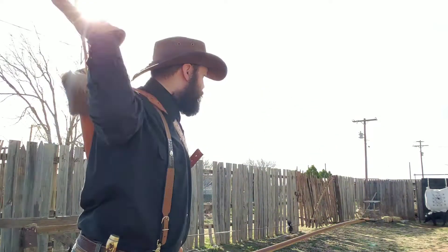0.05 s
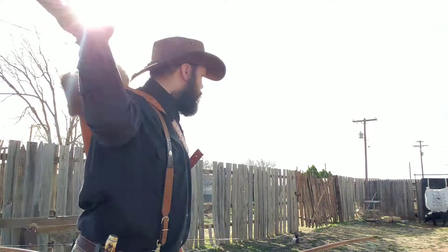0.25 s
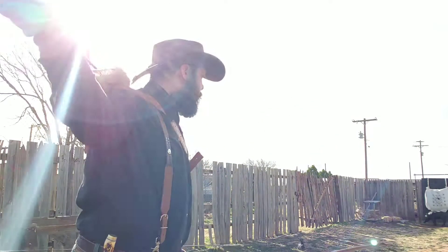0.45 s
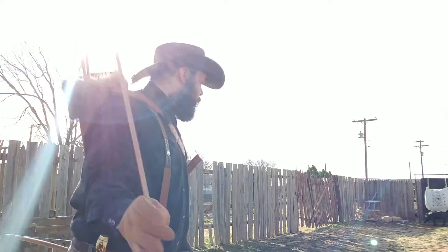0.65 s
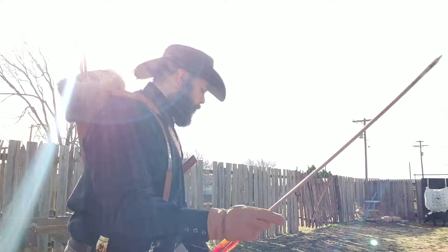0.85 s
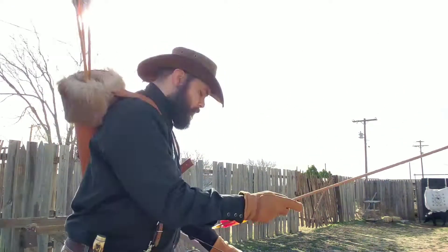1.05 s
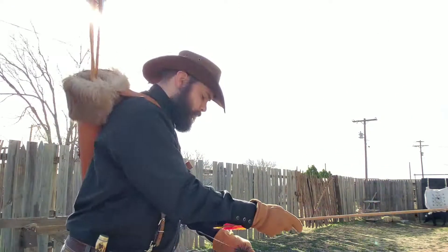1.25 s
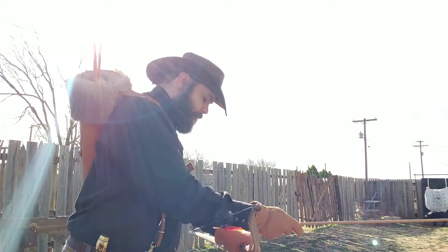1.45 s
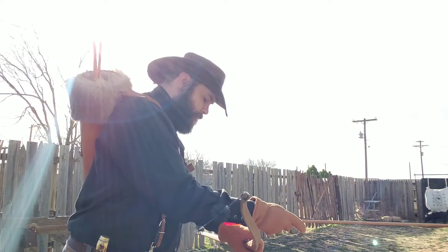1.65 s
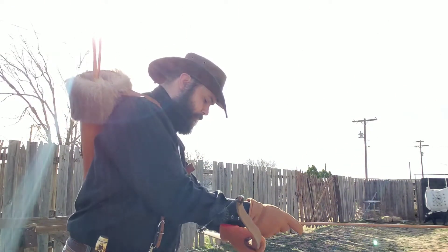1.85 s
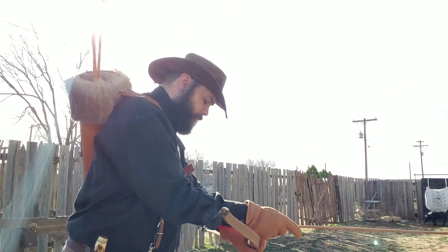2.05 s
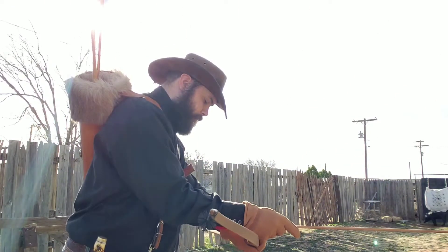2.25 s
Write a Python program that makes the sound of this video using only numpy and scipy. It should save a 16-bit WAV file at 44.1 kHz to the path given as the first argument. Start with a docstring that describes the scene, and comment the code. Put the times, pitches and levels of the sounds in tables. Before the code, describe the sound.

Wooden arrows tick and knock together as one slides from a quiver outdoors. Soft swishes of shaft and sleeve follow, then a few small clicks, while light gusts rumble unevenly on the microphone.

```python
"""Drawing an arrow from a quiver

In a quiet yard a wooden arrow scrapes out of a back quiver. It knocks against the others, exciting
bending modes of the shafts and the quiver's hollow note, then swishes softly down to the bow.
Eddies in the light wind rumble on the microphone ports; faint, thin whistles come and go."""
import sys
import numpy as np
from scipy import signal
from scipy.fft import rfft, irfft
from scipy.io import wavfile
from scipy.ndimage import uniform_filter1d

SR = 44100
rng = np.random.default_rng(int(sys.argv[2]) if len(sys.argv) > 2 else 0)


def output_pcm(signal):
    """Save a mono or channel-first signal as 16-bit PCM at the path in sys.argv[1].

    Samples are clipped to [-1, 1] before scaling.
    """
    pcm = np.clip(np.atleast_2d(signal).T, -1, 1) * 32767
    wavfile.write(sys.argv[1], SR, np.round(pcm).astype(np.int16))


N = 105840
T = np.arange(N) / SR

# Shaft impacts: t/s, click level/dB, click f/Hz, relative ring level/dB, quiver level/dB, left-right/dB
IMPACTS = [(.0238, -40, 4900, -63, -77, 3), (0.0265, -42, 5500, -75, -79, 4),
           (.0352, -51.5, 6200, -72, -77, 3.5), (.0742, -54, 5030, -54, -55, 5.5),
           (.5033, -22, 4720, -42, -66, 6), (.5062, -34, 4940, -60, -78, 5.5),
           (0.504, -35, 2520, -58, -65, 3.5), (0.528, -43.5, 3700, -53, -67, 4.5),
           (.5354, -36, 5400, -51, -56.5, 4.5), (.5550, -50, 1100, -69, -61, 13),
           (.5641, -33.5, 5100, -52.5, -44, 4.5), (0.564, -45, 1220, -56, -70, 0),
           (.5775, -48, 4420, -59, -48, -4), (.5955, -40.5, 4000, -67, -59, 1),
           (.6212, -51, 3810, -70, -64, 5), (.6572, -55.5, 4050, -78, -81, 6),
           (2.3770, -51.5, 4400, -74, -80, 3), (2.3927, -45, 970, -66, -64, 2),
           (2.3936, -39.5, 5360, -64, -66, 3)]
# Bending modes of the shafts: f/Hz, relative level/dB, T60/s
SHAFT_MODES = [(942.7, -1.5, 0.063), (1113, -6.5, 0.095), (1280, -9, 0.0475), (1523, -4, 0.056),
               (1900, 3.5, 0.064), (2300, -2, 0.073), (2544, 2.5, 0.024), (2780, 2.5, 0.05),
               (3580, 4.5, 0.026), (4130, -2, .035), (4770, 1.5, 0.029), (5286, 1, 0.042), (5730, -1, .025)]
# Envelope of shaft rubbing on shaft: t/s, level/dB
SCRAPE_ENVELOPE = [(0, -59.5), (.04, -60), (.075, -66), (.12, -69), (.2, -79), (.33, -75), (.43, -69.5),
                   (.49, -68), (.58, -70), (.64, -73), (.76, -75.5), (1.3, -81), (1.5, -93), (2.12, -78),
                   (2.2, -77.5), (2.3, -80), (2.4, -64.5)]
# Spectrum of that friction: f/Hz, relative level/dB
SCRAPE_SPECTRUM = [(400, -21), (900, -8), (1600, -10), (2700, -6), (3400, -6), (4900, -0.5), (6800, 0),
                   (8800, -16), (13000, -9), (15000, -10.5)]
# Swishes of shaft, glove and sleeve: peak t/s, rise/s, T60/s, f/Hz, half-width/octaves, level/dB
SWISH_BANDS = [(0.091, 0.0089, 0.21, 784.6, 0.042, -57.5), (.09, .012, 0.03, 1420, 0.225, -67.5),
               (.925, 0.037, 0.3656, 2520, 0.16, -62), (.95, 0.045, 0.53, 1596, 0.097, -63),
               (.92, 0.0514, 1.15, 874, 0.095, -62.5), (1.272, 0.023, 0.47, 835, 0.095, -57.5),
               (1.28, 0.047, 0.62, 1316, 0.123, -60.5), (1.29, .04, 0.37, 1940, 0.2, -64),
               (1.58, 0.036, 0.46, 1050, .15, -70), (1.56, 0.068, 0.46, 478.3, 0.074, -65.5),
               (1.93, .04, 0.8, 619, .08, -65.5), (1.972, 0.014, 0.16, 600, 0.084, -53.5),
               (2.0, 0.093, 0.8, 1200, .2, -75)]
# Spectrum of the yard's reverberation: f/Hz, gain/dB
YARD_SPECTRUM = [(300, -15), (900, 6.5), (2000, 7), (3200, 3), (4500, -1.5), (7000, -3.5), (14000, -4)]
# Envelope of the wind on the microphone: t/s, relative level/dB
GUST_ENVELOPE = [(0.0, -49), (0.07, -51.5), (0.09, -44.5), (0.14, -55), (0.2, -51), (0.24, -34.5),
                 (0.34, -42), (0.41, -27), (0.41, -30), (0.54, -30.5), (0.57, -40), (0.6, -29),
                 (0.62, -26.5), (0.65, -41.5), (0.67, -30.5), (0.69, -32.5), (0.73, -54.5), (0.75, -34.5),
                 (0.91, -41), (0.94, -35), (1.14, -47.5), (1.25, -60.5), (1.27, -48), (1.28, -42),
                 (1.32, -50), (1.52, -67.5), (1.71, -48), (1.82, -45), (1.84, -39.5), (1.93, -55),
                 (1.97, -45.5), (2.14, -61.5), (2.18, -48.5), (2.23, -49), (2.25, -58), (2.3, -51),
                 (2.35, -64), (2.4, -61.5)]
# Spectrum of strong gusts: f/Hz, relative level/dB
STRONG_SPECTRUM = [(10, -30), (25, -9), (58, 1.5), (85, 0.5), (120, 0), (175, -7), (260, -13), (400, -25.5),
                   (600, -43), (1000, -67), (2500, -90)]
# Spectrum of weak gusts: f/Hz, relative level/dB
WEAK_SPECTRUM = [(10, -34.5), (25, -4), (55, 1.5), (105, 1), (165, -8), (250, -17.5), (400, -33),
                 (600, -44.5), (1000, -59), (2500, -88)]
# Single sharp eddies: t/s, width/s, peak level/dB, left-right/dB
EDDIES = [(.243, .0018, -30, 8), (.314, .0012, -31.5, 8.5), (.322, 0.00071, -37.5, 12),
          (.405, 0.0019, -21.5, 1), (0.5244, 0.0012, -24.5, 8), (.555, 0.00065, -33.5, 11.5),
          (.615, 0.002, -23.5, 8), (.760, 0.0011, -29, 5), (.815, 0.001043, -33, 2.5),
          (.935, 0.0019, -30, -3), (.952, .0013, -28.5, 3.5), (1.282, .0019, -35.5, -4),
          (1.845, 0.0013, -36.5, 2), (1.977, 0.00194, -35.5, 5)]
# Thin whistles: peak t/s, rise/s, fall/s, f/Hz, bandwidth/Hz, level/dB
WHISTLE_BANDS = [(0.31, 0.033, 0.2, 5110, 46, -71), (0.4, 0.12, 0.18, 5830, 80, -72.5),
                 (0.337, 0.043, 0.13, 8700, 240, -75), (.36, .06, .08, 9350, 200, -82),
                 (0.314, .04, 0.075, 13470, 160, -71.5), (1.881, 0.074, 0.14, 5060, 20, -70),
                 (1.844, 0.054, 0.083, 8700, 120, -82.5), (2.29, 0.0873, 0.057, 5115, 22, -65.5),
                 (2.3, 0.103, .08, 5830, 110, -75), (2.21, .05, 0.075, 8800, 320, -78),
                 (2.22, 0.057, .08, 13480, 150, -73)]
# Spectrum of the ambient hush: f/Hz, relative level/dB
AIR_SPECTRUM = [(150, 2.5), (480, -1.5), (650, -10), (900, -7), (1440, -17), (2000, -15), (2600, -19),
                (4500, -20.5), (5500, -20.5), (6500, -16), (8300, -24), (13500, -19), (14600, -19.5)]


def knock(click_db, click_hz, ring_db, hollow_db, pan_db):
    """Impact excitation: a brief contact burst leaves shafts and quiver in damped free vibration."""
    t = np.arange(SR // 4) / SR
    u = t * click_hz / 1.6  # the burst peaks after 1.6 cycles
    carrier = np.sin(2 * np.pi * click_hz * t) + 0.031 * rng.standard_normal(len(t))
    click = amp(click_db) * (u * np.exp(1 - u)) ** 2 * carrier
    click = click + reflections(click, t)
    ring = 0
    for hz, db, t60 in SHAFT_MODES:
        mode_db = db + rng.standard_normal()
        ring += amp(mode_db - 60 * t / t60) * np.sin(2 * np.pi * (hz * t + rng.random()))
    ring *= amp(ring_db - 5) * (1 - np.exp(-u))
    hollow_hz, hollow_t60_s = 805.1, 0.11
    hollow = amp(hollow_db - 60 * t / hollow_t60_s) * np.sin(2 * np.pi * hollow_hz * t)
    return pan(pan_db) * (click + ring) + hollow


def reflections(click, t, delay_s=0.00095, decay_s=0.002):
    """Scattering: quiver, hat and shoulder return a dense cluster of early echoes."""
    late = np.maximum(t - delay_s, 0) / decay_s
    taps = rng.standard_normal((2, len(t))) * np.sqrt(late) * np.exp(-late)
    taps *= amp(-2.5) / np.linalg.norm(taps[0])
    return signal.fftconvolve(click[None], taps, axes=1)[:, :len(t)]


def rattle(delay_s=0.00023):
    """Path difference: each knock reaches the left port first and the right after a delay."""
    out = np.zeros((2, N))
    for s, *impact in IMPACTS:
        sound = knock(*impact)
        span = out[:, round(s * SR):][:, :sound.shape[1]]
        span += sound[:, :span.shape[1]]
    f = np.fft.rfftfreq(N, 1 / SR)
    out[1] = irfft(rfft(out[1]) * np.exp(-2j * np.pi * f * delay_s), N)
    return out


def scrape(grain_db=2.5):
    """Sliding friction of wood on wood: broadband noise, made grainy by random amplitude modulation."""
    grain = unit(uniform_filter1d(rng.standard_normal(N), size=120))
    rub = noise(correlation=0.24) * amp(grain_db * grain)
    return unit(colour(rub, SCRAPE_SPECTRUM)) * amp(np.interp(T, *np.transpose(SCRAPE_ENVELOPE)))


def swishes():
    """Light friction of shaft, glove and sleeve: noise bands swell, then decay exponentially."""
    out = np.zeros((2, N))
    for s, rise, t60, hz, octaves, db in SWISH_BANDS:
        swell = np.exp(-(np.minimum(T - s, 0) / rise) ** 2)
        decay = amp(db - 60 * np.maximum(T - s, 0) / t60)
        out += swell * decay * band(hz, hz * (2 ** octaves - 1), correlation=-0.24)
    return out


def yard(x, t60_s=0.31, onset_s=0.0064, echoes_per_s=3000):
    """Reverberation: reflections from fence and ground form a short, thin, exponential tail."""
    t = np.arange(SR // 2) / SR
    taps = rng.standard_normal((2, len(t))) * (rng.random((2, len(t))) < echoes_per_s / SR)
    tail = taps * amp(-60 * t / t60_s) * np.minimum(t / onset_s, 1)
    tail = colour(tail / np.linalg.norm(tail[0]), YARD_SPECTRUM)
    return amp(-12) * signal.fftconvolve(x, tail, axes=1)[:, :N]


def wind(weak_db=-49, strong_db=-32.5, window_s=0.04):
    """Turbulence: pressure fluctuates independently at each port; stronger gusts reach higher in pitch."""
    level_db = uniform_filter1d(np.interp(T, *np.transpose(GUST_ENVELOPE)), size=300)
    force = np.clip((level_db - weak_db) / (strong_db - weak_db), 0, 1)
    pressure = noise(correlation=0)
    rumble = force * unit(colour(pressure, STRONG_SPECTRUM))
    rumble += (1 - force) * unit(colour(pressure, WEAK_SPECTRUM))
    power = signal.fftconvolve((rumble ** 2).mean(0), signal.windows.hann(int(window_s * SR)), "same")
    steady = unit(rumble / np.sqrt(abs(power) + 1e-9))  # leaves the envelope to set the loudness
    return steady * amp(level_db + 2.5) * pan(db=1.16)


def buffets():
    """Convection: an eddy carried across the ports gives one swing of pressure."""
    out = np.zeros((2, N))
    for s, width, db, pan_db in EDDIES:
        u = (T - s) / width
        out += amp(db) * pan(pan_db) * (u * u - 1) * np.exp(-u * u / 2)
    return out


def whistles():
    """Narrowband noise is heard as pitch: faint, steady-pitched tones fade in and out."""
    out = np.zeros((2, N))
    for s, rise, fall, hz, width, db in WHISTLE_BANDS:
        swell = np.exp(-((T - s) / np.where(T < s, rise, fall)) ** 2)
        analytic = signal.hilbert(band(hz, width / 2, correlation=0.42))
        tone = unit(analytic.real / (abs(analytic) + 0.48))  # partly evens out the flutter
        out += amp(db) * swell * tone
    return out * pan(db=6)


def air():
    """Stationary noise, nearly uncorrelated between the ports: the hush of the yard."""
    return amp(-66.5) * unit(colour(noise(correlation=0.078), AIR_SPECTRUM))


def amp(db):
    """Amplitude ratio of a level in decibels."""
    return 10 ** (np.asarray(db) / 20)


def unit(x):
    """Normalisation to rms 1."""
    return x / np.sqrt(np.mean(x ** 2) + 1e-20)


def pan(db):
    """Left and right gains for a level difference."""
    return amp(np.array([[db], [-db]]) / 2)


def colour(x, spectrum):
    """Spectral shaping by points of f/Hz, gain/dB."""
    f, db = np.transpose(spectrum)
    hz = np.fft.rfftfreq(x.shape[-1], 1 / SR)
    gain = amp(np.interp(np.log(hz + 1), np.log(f), db))
    return irfft(rfft(x) * gain, x.shape[-1])


def noise(correlation):
    """Partial coherence: two channels of white noise share a component."""
    a, b = rng.standard_normal((2, N))
    return np.array([a, correlation * a + np.sqrt(1 - correlation ** 2) * b])


def band(hz, half_width_hz, correlation):
    """Resonance: noise filtered by one Lorentzian peak."""
    f = np.fft.rfftfreq(N, 1 / SR)
    return unit(irfft(rfft(noise(correlation)) / (1 + ((f - hz) / half_width_hz) ** 2), N))


def scene():
    """Superposition of the arrow's sounds, their reverberation and the background."""
    knocks = rattle()
    return knocks + yard(knocks) + scrape() + swishes() + whistles() + wind() + buffets() + air()


def record(dry):
    """Band limiting: a low-pass filter removes the highest treble."""
    lowpass = signal.firwin(511, cutoff=14600, window=("kaiser", 9), fs=SR)
    return signal.oaconvolve(dry, lowpass[None], "same")


dry = scene()
out = record(dry)
output_pcm(out)
```